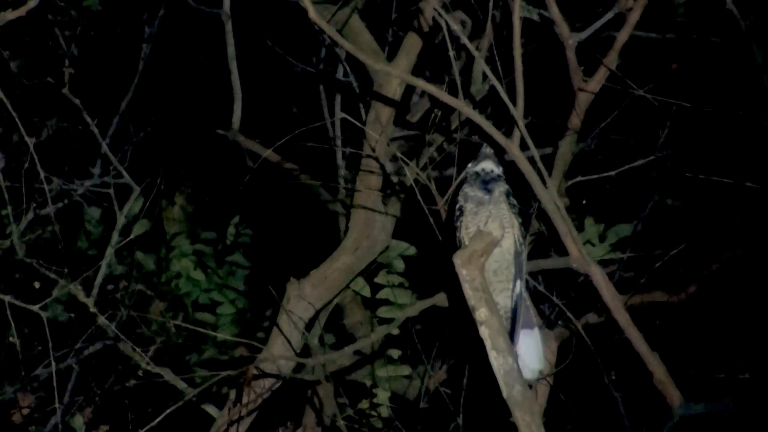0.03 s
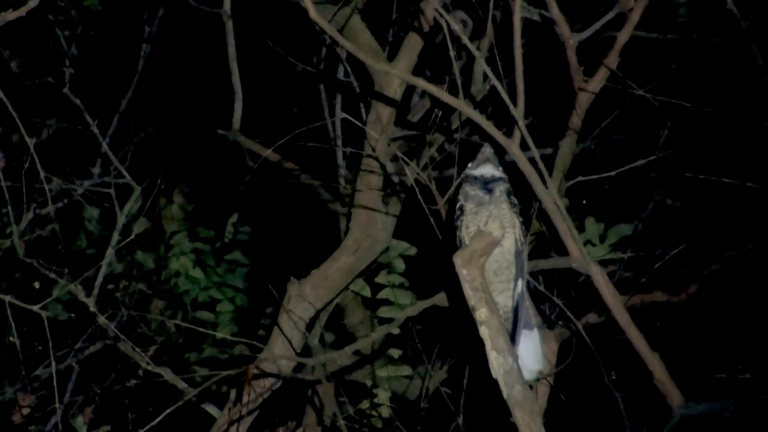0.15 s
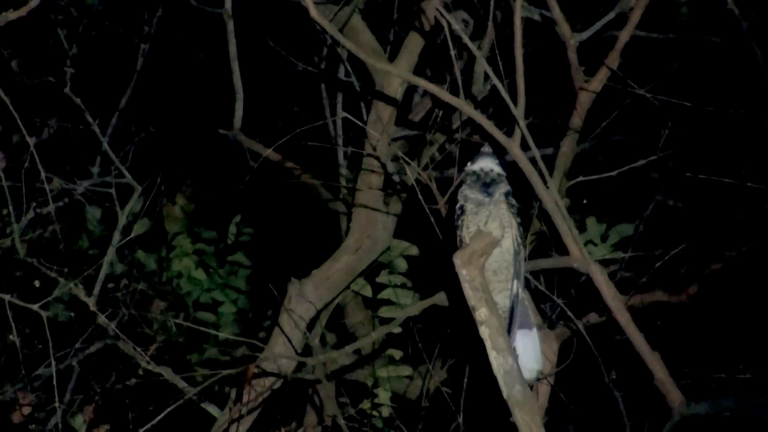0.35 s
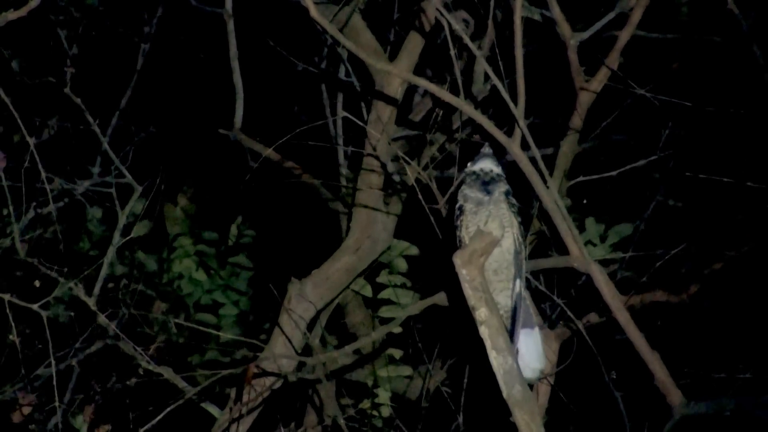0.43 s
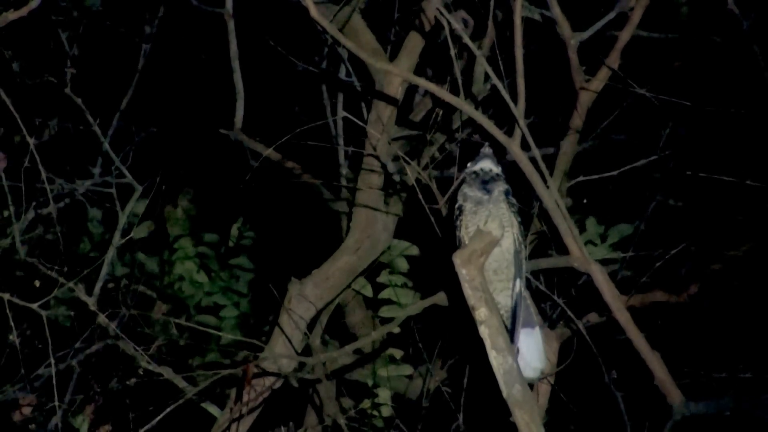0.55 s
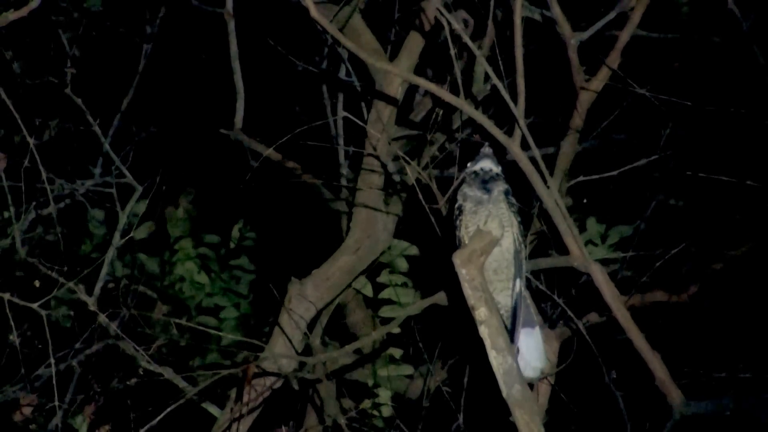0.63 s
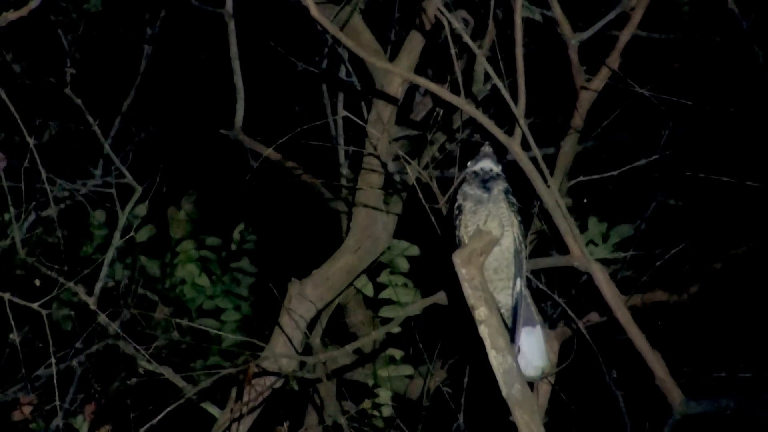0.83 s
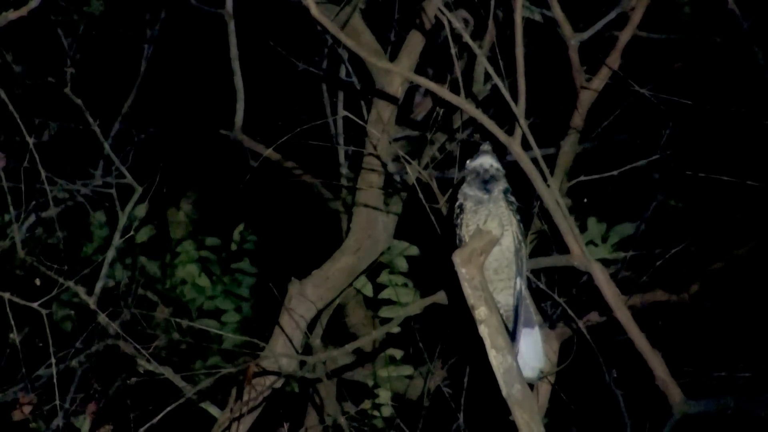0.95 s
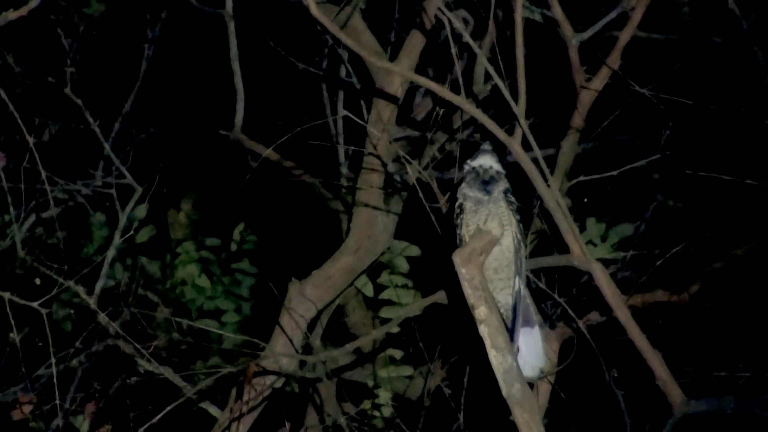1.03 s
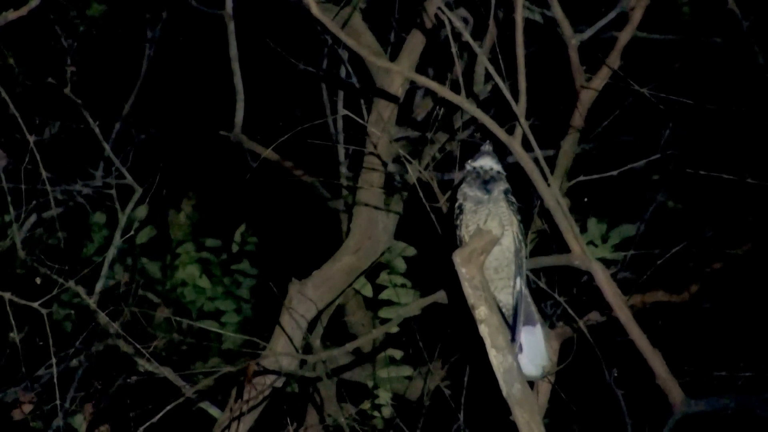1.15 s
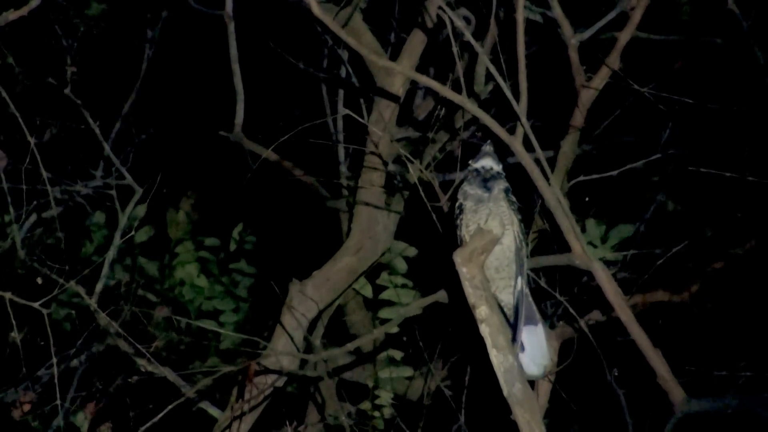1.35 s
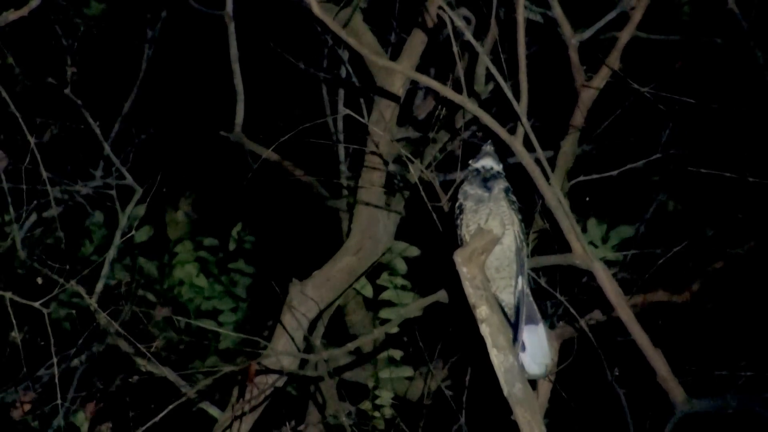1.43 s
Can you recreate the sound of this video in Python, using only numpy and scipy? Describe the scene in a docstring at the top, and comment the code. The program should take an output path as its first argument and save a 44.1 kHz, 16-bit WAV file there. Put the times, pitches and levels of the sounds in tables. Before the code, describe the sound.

Two sharp nightjar calls, each trailing soft knocks, above faint insect hiss and low rumble.

```python
"""Night woodland. From the start: a hush of air, a low distant rumble and insect choruses, all shaped noise.
At 0.25 s a nightjar calls from a perch: a sharp, nearly pure note that drops an octave in 30 ms,
then three soft low knocks. Ground, foliage and trunks throw the call back.
At 1 s the bird calls again, and the echoes fade into the insect hiss."""
import sys
import numpy as np
from scipy import signal
from scipy.fft import rfft, irfft
from scipy.io import wavfile
from scipy.ndimage import uniform_filter1d

SR = 44100
rng = np.random.default_rng(int(sys.argv[2]) if len(sys.argv) > 2 else 0)


def persist_wave(psi):
    """Save psi, clipped to +-1, as 16-bit WAV."""
    counts = np.round(np.clip(psi, -1, 1) * 32767).astype(np.int16)
    wavfile.write(sys.argv[1], SR, np.atleast_2d(counts).T)


N = 66150
BIN_HZ = np.arange(N // 2 + 1) * SR / N


def undb(db):
    """Decibels to gain."""
    return 10 ** (np.asarray(db) / 20)


def unit(x):
    """Scale to rms 1."""
    return x / np.sqrt(np.mean(x ** 2))


def pan(db):
    """Left and right gains for an L-R level difference."""
    return undb(np.array([[db], [-db]]) / 2)


def spread(mid, side):
    """Mid and side to left and right."""
    return np.array([mid + side, mid - side])


def colour(hz, points):
    """Gain at hz of a (Hz, dB) curve."""
    f, db = np.array(points).T
    return undb(np.interp(np.log(np.maximum(hz, 1)), np.log(f), db))


def noise(bin_gains):
    """Noise of rms 1, shaped by a gain at each BIN_HZ."""
    return unit(irfft(rfft(rng.standard_normal(N)) * bin_gains, N))


def band(hz, width_hz):
    """Noise in one resonance."""
    return noise(1 / (1 + ((BIN_HZ - hz) / (0.61 * width_hz)) ** 2))


def walk(rate_hz):
    """Random wavering of rms 1."""
    return noise(np.exp(-(BIN_HZ / rate_hz) ** 2) * (BIN_HZ > 0))


def night_air():
    """Broad hush, a deep drone and a wavering low rumble, all far away."""
    # Each row: frequency in Hz, relative spectral density in dB.
    spectrum = [(20, -20), (40, -7.5), (55, -9), (110, 1), (200, 0), (330, 1.5), (480, 0), (800, -3),
                (1500, -10), (2200, -11), (4000, -16.5), (6200, -19), (7300, -20), (9500, -27),
                (12000, -25), (15500, -35)]
    # Each row: frequency in Hz, side re mid in dB.
    stereo_width = [(20, -32), (120, -72), (300, -23.5), (600, -10.5), (1200, -1), (2500, -2.5),
                    (5000, -2.5), (9000, -4.5), (11000, -3), (12500, -39)]
    hush_db, drone_db, rumble_db = -58.5, -70, -67
    mid, side = (noise(colour(BIN_HZ, spectrum)) for _ in range(2))
    side = irfft(rfft(side) * colour(BIN_HZ, stereo_width), N)
    hush = spread(mid, side) * pan(db=1) * undb(hush_db + 0.82 * walk(rate_hz=5.8))
    drone = undb(drone_db) * band(hz=72.5, width_hz=12.4)
    rumble = undb(rumble_db + 2 * walk(rate_hz=8.7)) * band(hz=328.7, width_hz=82)
    return hush + drone + rumble


def insects():
    """Distant choruses, each a narrow fluttering band."""
    # Each row: centre in Hz, width in Hz, level in dB, L-R in dB, side gain, flutter in dB.
    choruses = [(1620, 270, -81.5, 14, 1, -5.5), (2983, 200, -77, -3, 0.93, 2)]
    out = np.zeros((2, N))
    for hz, width_hz, db, pan_db, side_gain, flutter_db in choruses:
        flutter = (walk(rate_hz=6.5) + walk(rate_hz=72)) / np.sqrt(2)
        chorus = spread(band(hz, width_hz), side_gain * band(hz, width_hz))
        out += undb(db + flutter_db * flutter) * pan(pan_db) * chorus
    return out


def crickets(t):
    """The nearest crickets merge into one shrill band that swells and sinks."""
    # Each row: time in seconds, level change in dB.
    swell = [(0, -8), (.16, 0), (.28, -5.5), (.38, 1.5), (.49, -4.5), (.6, 0), (.88, -0.5), (.96, -1),
             (1.099, -1.5), (1.5, 0)]
    centre_hz, width_hz, level_db, flutter_db = 5142, 490, -68, 1.5
    spectrum = 1 / (1 + (abs(BIN_HZ - centre_hz) / (0.87 * width_hz)) ** 3)
    chorus = spread(noise(spectrum), 0.55 * noise(spectrum))
    swell_db = np.interp(t, *np.array(swell).T)
    return chorus * undb(level_db + swell_db + flutter_db * walk(rate_hz=50)) * pan(db=3.5)


def katydid():
    """Fast, regular wing strokes pulse a high resonance."""
    centre_hz, width_hz, level_db, waver_db = 10630, 580, -80.5, 1.3
    stroke_hz = 131 * (1 + 0.011 * walk(rate_hz=1.8))
    strokes = 1 + 0.7 * np.sin(2 * np.pi * np.cumsum(stroke_hz) / SR)
    wings = spread(band(centre_hz, width_hz), 0.33 * band(centre_hz, width_hz))
    return wings * unit(strokes) * undb(level_db + waver_db * walk(rate_hz=30)) * pan(db=-10.5)


def opening_note(t):
    """A whistle that leaps up and falls an octave, with faint rasping overtones and an onset crack."""
    # Each row: time into the note in seconds, pitch in Hz, relative level in dB.
    contour = [(0.0, 1250, -19), (0.0016, 1400, -15), (0.003, 1690, -4), (0.0045, 1700, 0),
               (0.008, 1660, -0.8), (0.0113, 1550, -1.5), (0.0128, 1380, -9.5), (0.019, 1080, -12.5),
               (0.024, 930, -12), (0.0295, 830, -13.5), (0.032, 650, -22), (0.040, 580, -26)]
    # Strength of the faint, buzzy overtones. Each row: frequency in Hz, gain re the fundamental in dB.
    overtone_gains = [(1800, -32.5), (2600, -17), (3400, -44.5), (4200, -25), (5100, -42), (5800, -83),
                      (6900, -22.5), (7800, -37), (9200, -70), (10200, -32.5), (11800, -30.5), (13000, -77)]
    attack_s, release_s, rasp_fade_s, crack_s = 0.00015, 0.0012, 0.025, 0.00073
    times_s, hz, db = np.array(contour).T
    pitch_hz = np.interp(t, times_s, hz)
    gate = np.clip(t / attack_s, 0, 1) * np.clip((times_s[-1] - t) / release_s, 0, 1)
    level = uniform_filter1d(undb(np.interp(t, times_s, db)) * gate, size=36).clip(0)
    phase = 2 * np.pi * np.cumsum(pitch_hz * (t > 0)) / SR
    jitter_rad = 0.07 * walk(rate_hz=920)
    rasp = sum(colour(k * pitch_hz, overtone_gains) * np.sin(k * (phase + jitter_rad))
               for k in range(2, 11))
    rasp /= 1 + (t / rasp_fade_s) ** 6
    snap = undb(-26.5) * band(hz=2750, width_hz=1700)
    crack = (undb(-25.5) * np.sin(2 * phase) + snap) * np.exp(-(t / crack_s - 1.5) ** 2)
    return level * (np.sin(phase) + rasp) + crack


def knock(t, hz, half_s, glide_hz_per_s):
    """A short rounded hoot centred on t = 0, its pitch sagging on both flanks."""
    sag_hz, wobble_hz, steepness = 206, 6.7, 0.89
    u = np.clip(t / half_s, -12, 12)
    glide_hz = glide_hz_per_s * half_s * np.tanh(u)
    pitch_hz = hz + glide_hz - sag_hz * np.tanh(u / 3) ** 2 + wobble_hz * walk(rate_hz=220)
    turns = np.cumsum(pitch_hz) / SR
    phase = 2 * np.pi * (turns - np.interp(0, t, turns))
    return (np.sin(phase) + undb(-26) * np.sin(2 * phase)) / np.cosh(steepness * u)


def nightjar(t):
    """Two calls, each an opening note and three knocks."""
    # Each row: start in seconds, level in dB.
    notes = [(0.2455, -20), (1.0004, -20)]
    # Each row: middle in seconds, level in dB, pitch in Hz, half length in seconds, glide in Hz/s.
    knocks = [(0.2975, -29.5, 811, 0.0037, 8000), (0.338, -32.5, 800, 0.00536, 3000),
              (0.383, -38, 805, 0.0046, -500), (1.052, -30, 811, 0.0036, 10002),
              (1.0920, -31.5, 844, 0.0034, 8000), (1.135, -37, 808, 0.005, 998)]
    voice = sum(undb(db) * opening_note(t - start_s) for start_s, db in notes)
    for middle_s, db, hz, half_s, glide_hz_per_s in knocks:
        voice += undb(db) * knock(t - middle_s, hz, half_s, glide_hz_per_s)
    return voice


def woodland(voice, t):
    """Direct sound, dull ground echoes, quick leaf scatter, a blurred echo from trees and a long tail."""
    # Soft-ground echoes. Each row: delay in seconds, level in dB, L-R in dB, cutoff in Hz.
    echoes = [(.0073, -8.5, 2, 1450), (.0126, -10.5, 1, 1100)]
    # Foliage scatter. Each row: frequency in Hz, relative level in dB.
    foliage = [(500, 11.5), (750, -1), (1000, -1.5), (1300, 6), (1700, 0), (2400, -10), (5000, -11),
               (7000, 4), (12000, -5.5)]
    pan_db, left_lag_s, scatter_delay_s = 3.5, 25e-6, 0.0072
    centred_above_hz, trees_s, trees_blur_s = 6400, 0.0665, 0.015

    def delayed(delay_s, gain):
        return irfft(rfft(voice) * gain * np.exp(-2j * np.pi * BIN_HZ * delay_s), N)

    def decay(t60_s):
        return np.exp(-np.log(1000) * t / t60_s) * np.clip(t / scatter_delay_s - 1, 0, 1)

    off_centre = 1 / (1 + (BIN_HZ / centred_above_hz) ** 4)
    left = delayed(left_lag_s * off_centre, undb(pan_db * off_centre / 2))
    right = delayed(0, undb(-pan_db * off_centre / 2))
    out = np.array([left, right])
    for delay_s, db, echo_pan_db, cutoff_hz in echoes:
        lowpass = 1 / np.hypot(1, (BIN_HZ / cutoff_hz) ** 10)
        out += undb(db) * pan(echo_pan_db) * delayed(delay_s, lowpass)
    leaves, tail = decay(t60_s=0.21), decay(t60_s=1)
    trees = np.exp(-((t - trees_s) / trees_blur_s) ** 2)
    power = sum(undb(db) ** 2 * shape ** 2 / (2 * np.sum(shape ** 2))
                for db, shape in ((-13, leaves), (-16, trees), (-16.5, tail)))
    mid, side = (noise(colour(BIN_HZ, foliage)) for _ in range(2))
    response = spread(mid, 0.68 * side) * np.sqrt(power)
    return out + pan(pan_db / 2) * signal.fftconvolve(voice[None], response, axes=1)[:, :N]


def scene():
    """The bird in the wood over a background that rises slightly at the start."""
    rise_db, rise_s = 0.5, 0.14
    t = np.arange(N) / SR
    bird = woodland(nightjar(t), t)
    background = night_air() + insects() + crickets(t) + katydid()
    return bird + background * undb(-rise_db * np.clip(1 - t / rise_s, 0, 1))


def record(dry):
    """A steep low-pass cuts the top."""
    cutoff_hz = 15800
    return signal.sosfilt(signal.ellip(10, 0.2, 70, cutoff_hz, fs=SR, output="sos"), dry)


dry = scene()
out = record(dry)
persist_wave(out)
```